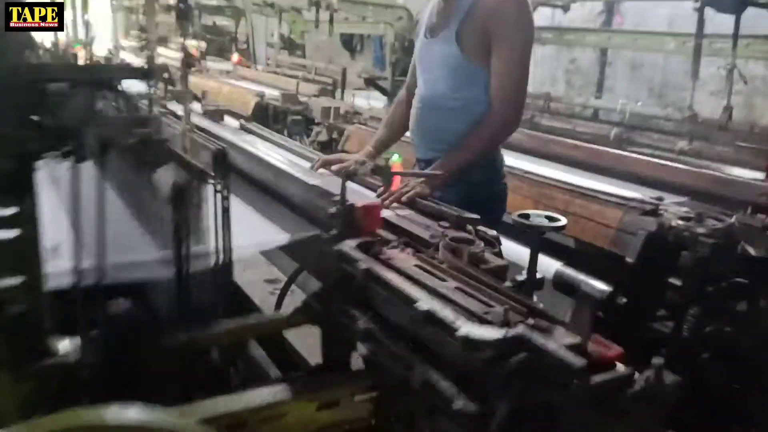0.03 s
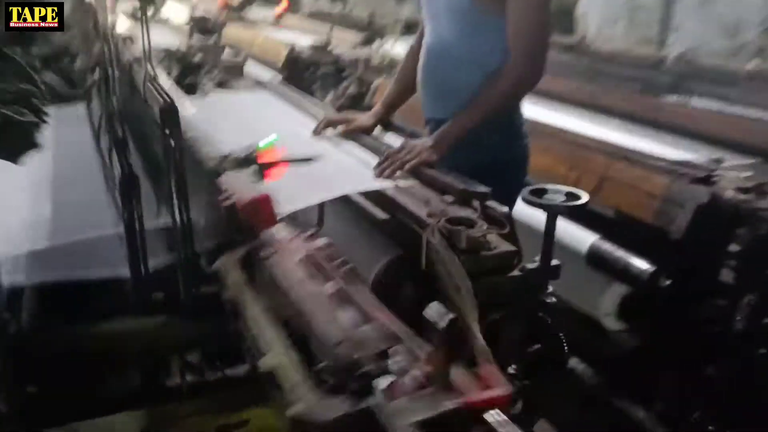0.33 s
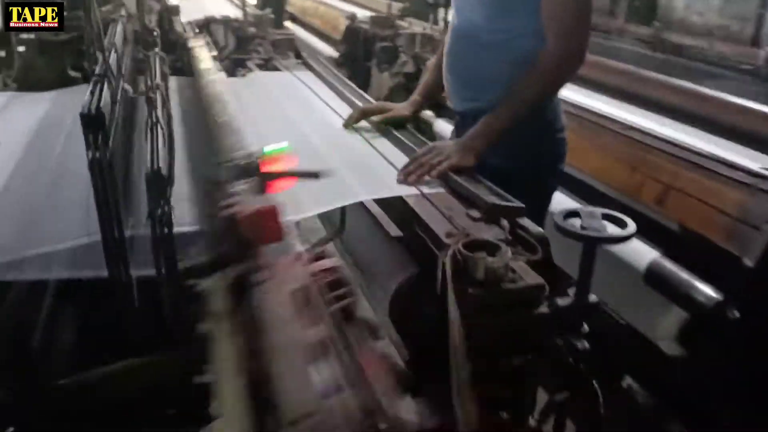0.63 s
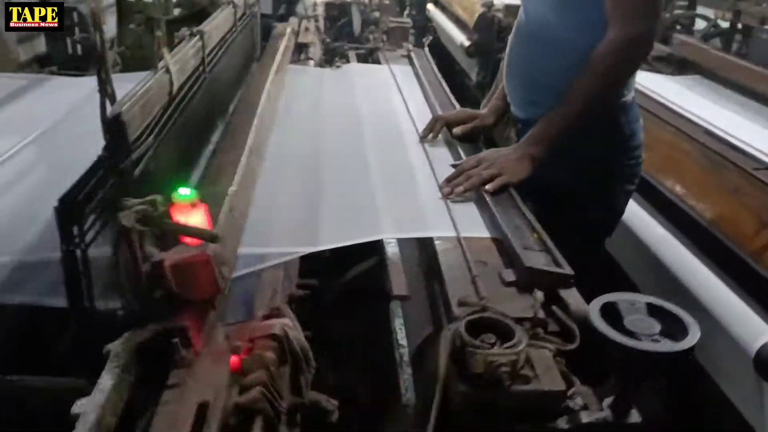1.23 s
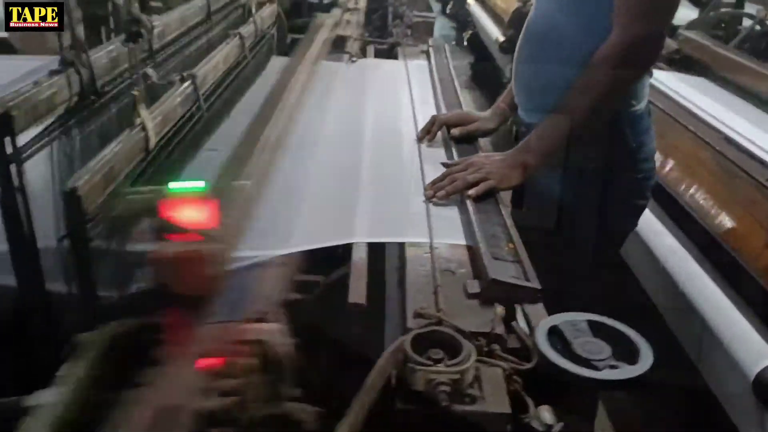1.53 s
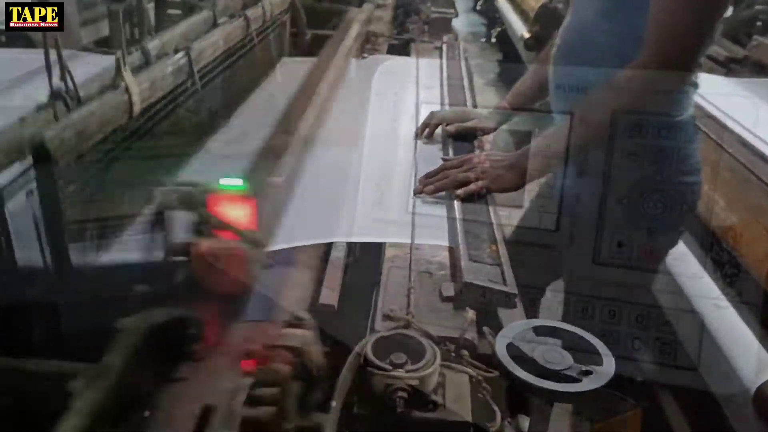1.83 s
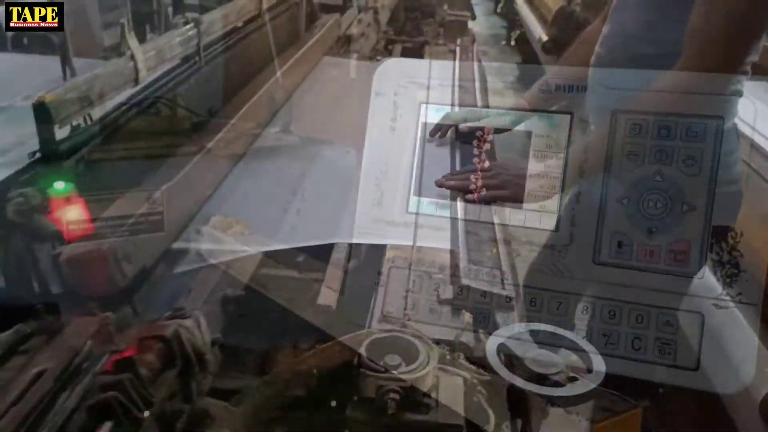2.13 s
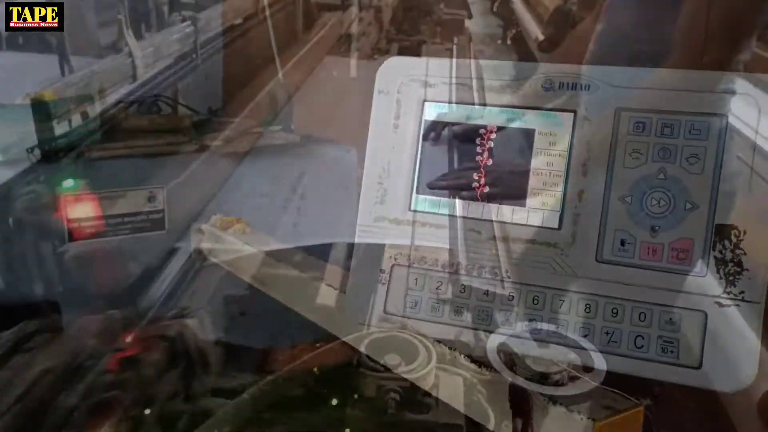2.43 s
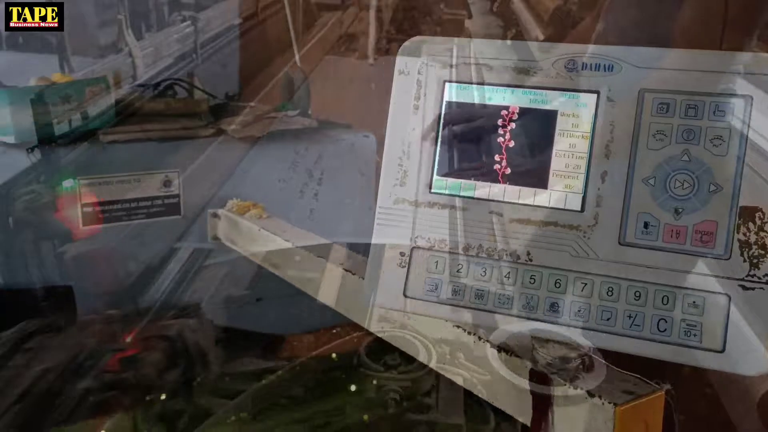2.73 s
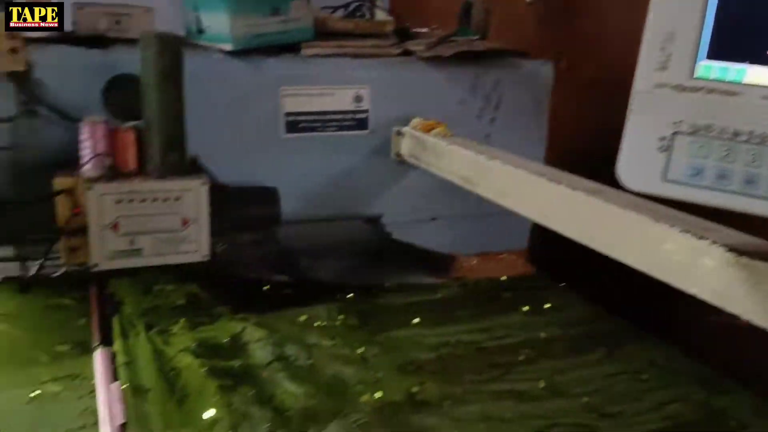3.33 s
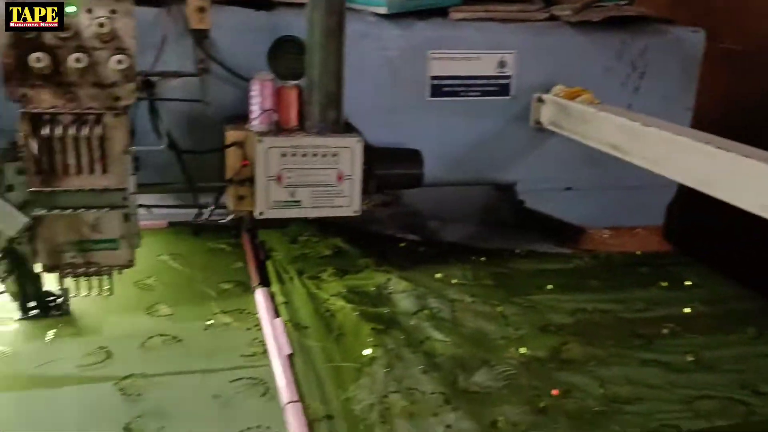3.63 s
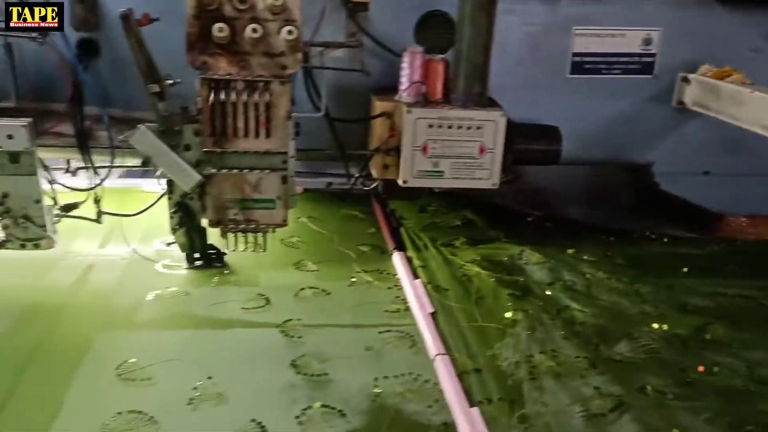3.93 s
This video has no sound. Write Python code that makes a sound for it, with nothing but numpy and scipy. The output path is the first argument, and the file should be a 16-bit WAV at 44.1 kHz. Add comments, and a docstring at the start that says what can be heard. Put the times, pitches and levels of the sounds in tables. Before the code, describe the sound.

Power looms clatter loudly, then an embroidery machine takes over with rapid, even stitching.

```python
"""Shuttle looms, then an embroidery machine.

A hall of shuttle looms clatters: the near loom bangs and rattles over the roar of the others.
The sound breaks off, and a multi-head embroidery machine fades in at nearly nine stitches a second.
Every stitch is the same run of needle-bar thuds, cam clacks and steel ticks; the frame keeps ringing."""
import sys
import numpy as np
from scipy import signal
from scipy.fft import rfft, irfft
from scipy.io import wavfile

SR = 44100
rng = np.random.default_rng(int(sys.argv[2]) if len(sys.argv) > 2 else 0)


def dump_mix(stems):
    """Bounce the given channels to the path in sys.argv[1] as a 16-bit WAV at rate SR."""
    frames = np.atleast_2d(stems).T  # one column per channel
    limited = np.clip(frames, -1, 1)  # hard clip at full scale
    pcm = np.round(limited * 32767).astype(np.int16)
    wavfile.write(sys.argv[1], SR, pcm)


N = 176400
T = np.arange(N) / SR
HZ = np.maximum(np.fft.rfftfreq(N, 1 / SR), 1)


def from_db(db):
    """Decibels to gain."""
    return 10 ** (np.asarray(db) / 20)


def unit_rms(x):
    """Scale to unit rms."""
    return x / np.sqrt(np.mean(x ** 2) + 1e-20)


def across_hz(rows):
    """Table columns interpolated over log frequency."""
    hz, *columns = np.transpose(rows)
    return np.array([np.interp(np.log(HZ), np.log(hz), column) for column in columns])


def clicks(times_s, gains):
    """Train of one-sample clicks."""
    out = np.zeros(N)
    inside = (times_s >= 0) & (times_s < T[-1])
    np.add.at(out, (times_s[inside] * SR).astype(int), gains[inside])
    return out


def lag(x, tau_s):
    """One-pole smoothing."""
    pole = np.exp(-1 / (tau_s * SR))
    return signal.lfilter([1 - pole], [1, -pole], x + 1e-18)


def bursts(start_s, level_db, rise_s, decay_s):
    """Power envelope of knocks: fast swell, exponential decay."""
    hits = clicks(start_s, from_db(level_db) ** 2)
    return lag(lag(hits, decay_s), rise_s) * decay_s * SR


def ring(drive, hz, t60_s):
    """One damped mode, at unit rms."""
    radius = np.exp(-np.log(1000) / (t60_s * SR))
    feedback = [1, -2 * radius * np.cos(2 * np.pi * hz / SR), radius * radius]
    return unit_rms(signal.lfilter([1, 0, -1], feedback, drive + 1e-18))


def crossover(bands):
    """Power-complementary band gains, one per row."""
    above = [1 / (1 + (row[0] / HZ) ** 12) for row in bands] + [0]
    return [np.sqrt(np.maximum(lower - upper, 0)) for lower, upper in zip(above, above[1:])]


def coloured(white, gains, correlation):
    """Two white noises to a stereo pair of given spectrum and left-right correlation."""
    mid, side = rfft(white)
    alike = np.clip(correlation, -1, 1)
    pair = np.sqrt(1 + alike) * mid + np.sqrt(1 - alike) * side * np.array([[1], [-1]])
    return irfft(pair * gains * np.sqrt(SR) / 2, N)


def rattle(rate_per_s=150, decay_s=0.0071, spread_db=2):
    """Small loose contacts at random times: power envelope, mean 1."""
    energies = from_db(spread_db * np.minimum(rng.exponential(1, N), 3)) ** 2
    power = lag(energies * (rng.random(N) < rate_per_s / SR), decay_s)
    return power / power.mean()


# Hall spectrum: freq_hz, left_db_per_hz, right_db_per_hz
HALL_SPECTRUM = [(25.2, -56, -62), (50, -54, -57), (90, -52.5, -59.5), (138, -52.5, -58.5), (338, -55, -59),
                 (490, -55.5, -60), (716, -51.5, -55), (1030, -52, -55.5), (1490, -48.5, -50),
                 (2260, -46, -44), (2880, -49, -49), (3350, -48, -48), (4120, -52, -52), (5440, -56.5, -47),
                 (6110, -55.5, -51.5), (6850, -57.5, -59), (8350, -53, -73.5), (10280, -67.5, -83),
                 (12400, -73, -76.5), (15000, -83, -91)]
# Hall stereo image: freq_hz, correlation
HALL_CORRELATION = [(60, 0.79), (180, 0.96), (550, 0.6), (1400, 0.00047), (5000, 0.02)]
# Mix by band: low_edge_hz, roar_db, blow_db, rattle_db
HALL_BANDS = [(15, -2, -17, -7.5), (251, -1, -14, -10), (1210, -2.5, -8.5, -6.5), (3400, -2.5, -.5, -6),
              (6800, -3.5, 0.5, -5)]


def hall_clatter(blow_power, rattle_power):
    """Steady roar of the looms; blows and rattles ring dense metal resonances, rendered as noise."""
    spectrum, correlation = from_db(across_hz(HALL_SPECTRUM)), across_hz(HALL_CORRELATION)
    out = np.zeros((2, N))
    for (_, roar_db, blow_db, rattle_db), band in zip(HALL_BANDS, crossover(HALL_BANDS)):
        power = from_db(roar_db) ** 2 + from_db(blow_db) ** 2 * blow_power
        power += from_db(rattle_db) ** 2 * rattle_power
        out += np.sqrt(power) * coloured(rng.standard_normal((2, N)), spectrum * band, correlation)
    return out


# Steel parts of the loom: pitch_hz, level_db, t60_s
STEEL_MODES = [(2043, -31, 0.089), (2257, -38, 0.088), (2360, -35, 0.13), (2490, -32.5, 0.14),
               (3227, -35.5, 0.059), (5210, -39, .04)]


def steel_ring(power):
    """Steel parts ring under the blows and rattles."""
    return sum(from_db(db) * ring(np.sqrt(power) * rng.standard_normal((2, N)), hz, t60_s)
               for hz, db, t60_s in STEEL_MODES)


# Drive tones: pitch_hz, level_db
HUM_TONES = [(53.8, -42), (201, -43.5)]


def drive_hum():
    """The drives hum in narrow, wavering tones."""
    return sum(from_db(db) * ring(rng.standard_normal(N), hz, t60_s=1.0) for hz, db in HUM_TONES)


# Loudest blows: start_s, left_db, right_db
PICKER_BLOWS = [(.009, -2, 0.5), (.052, -4, 2), (.101, -12, 0), (.25, -3, -2), (.296, -5, 0),
                (.385, -0.5, 0), (.458, -1, 1), (.507, -5, -1), (.574, -4, 1), (.697, -13, 0),
                (.775, -14, 2), (.908, 1.5, -8), (1.015, -3, 5), (1.073, 0, -2), (1.175, -11, -1),
                (1.2, -4, -2), (1.27, -4, 2), (1.31, -4, 1), (1.446, -1, 0), (1.492, -8, 0.5),
                (1.582, -6, -12), (1.687, -2, -3), (1.79, -3, -2), (1.853, -4, -6), (1.937, -6, 3.5),
                (1.958, -11, -3), (2.097, -3, -2), (2.22, -1, 3), (2.245, -10, -7), (2.291, -5, -10),
                (2.374, 1, -3)]


def blows(gain_db=0.5):
    """Pickers and sleys strike: stereo power envelope."""
    start_s, *sides_db = np.transpose(PICKER_BLOWS)
    return np.array([bursts(start_s, db + gain_db, rise_s=0.0023, decay_s=0.019) for db in sides_db])


# Hits on cast iron: start_s, level_db, pitch_hz
IRON_CLANKS = [(.02, -19, 2280), (.375, -23, 2240), (.53, -14.5, 2030), (.62, -19, 2080), (.69, -17, 2030),
               (.925, -17, 2420), (1.015, -20, 2380), (1.11, -28, 2330), (1.435, -17, 2210),
               (1.51, -16, 1950), (1.575, -19, 2230), (1.635, -15.5, 2350), (1.688, -17, 2480),
               (1.785, -16, 2560), (1.85, -20, 2460), (1.94, -19, 2540), (2.435, -21, 2230)]


def clanks():
    """Each cast-iron part rings briefly at its own pitch when hit."""
    noise = rng.standard_normal((2, N))
    out = np.zeros((2, N))
    for start_s, db, hz in IRON_CLANKS:
        power = bursts(np.array([start_s]), np.array([db]), rise_s=0.0023, decay_s=0.023)
        out += np.sqrt(power) * ring(noise, hz, t60_s=0.013)
    return out


# Heavy beat-ups: start_s, level_db
SLEY_THUMPS = [(.09, -21), (.51, -30), (.57, -24), (.685, -21.5), (1.015, -24), (1.135, -22), (1.37, -21.5),
               (1.944, -23), (2.214, -21)]
# Floor resonances: pitch_hz, level_db, t60_s
FLOOR_MODES = [(48, -4, 0.052), (128, -6.5, 0.06), (196, -12, 0.044)]


def sley_thumps():
    """Heavy beat-ups of the sley shake the floor."""
    shake = sum(from_db(db) * ring(rng.standard_normal(N), hz, t60_s) for hz, db, t60_s in FLOOR_MODES)
    return shake * np.sqrt(bursts(*np.transpose(SLEY_THUMPS), rise_s=0.0041, decay_s=0.011))


# Contacts of small steel parts: start_s, level_db
STEEL_CHINKS = [(.17, -27), (.275, -27), (.32, -29), (.385, -27), (.42, -26), (.525, -28), (.925, -32),
                (1.0, -29), (1.07, -30), (1.21, -26), (1.305, -29), (1.425, -26), (1.45, -26), (1.94, -31),
                (2.1, -27), (2.245, -25), (2.272, -29), (2.38, -24)]
# Their resonances: pitch_hz, level_db, t60_s
JINGLE_MODES = [(8300, -3.5, 0.0055), (10660, -7, .008), (11670, -5, 0.01), (12650, -8, .008)]


def chinks():
    """Small steel parts jingle brightly, mostly left."""
    jingle = sum(from_db(db) * ring(rng.standard_normal((2, N)), hz, t60_s)
                 for hz, db, t60_s in JINGLE_MODES)
    power = bursts(*np.transpose(STEEL_CHINKS), rise_s=0.0025, decay_s=0.018)
    return jingle * np.sqrt(power) * from_db([[0], [-13]])


# Shuttle impacts: start_s, level_db
SHUTTLE_HITS = [(.47, -27), (.71, -26), (1.018, -19), (1.18, -20.5), (1.312, -26), (1.497, -25),
                (1.693, -25), (1.945, -23), (2.226, -22)]
# Steel rung by the shuttle: pitch_hz, level_db, t60_s
BOX_MODES = [(820, -3.5, .04), (1410, 1, .03), (1980, 4, 0.033), (2520, 2, .03), (3500, -1, .025),
             (4700, 3, 0.018), (5260, 9.5, .025), (5900, 7, .025)]


def shuttle_cracks(bounce_s=0.006, bounce_loss_db=2):
    """The shuttle hits its box and bounces twice, ringing the steel; mostly right."""
    start_s, level_db = np.transpose(SHUTTLE_HITS)
    bounce = np.arange(3)
    times_s = start_s[:, None] + bounce_s * bounce * rng.uniform(0.8, 1.2, (len(start_s), len(bounce)))
    hits = clicks(times_s.ravel(), from_db(level_db[:, None] - bounce_loss_db * bounce).ravel())
    t = T[T < 0.1]
    steel = sum(from_db(db) * np.exp(-np.log(1000) * t / t60_s) * np.sin(2 * np.pi * hz * t)
                for hz, db, t60_s in BOX_MODES)
    return signal.fftconvolve(hits, steel)[:N] * from_db([[-8], [0]])


def looms(end_s=2.459, fade_db_per_s=2401):
    """All loom layers, breaking off at end_s."""
    blow_power = blows()
    rattle_power = (rattle() + np.array([rattle(), rattle()])) / 2  # half common, half per side
    out = hall_clatter(blow_power, rattle_power) + steel_ring(blow_power + rattle_power)
    out += clanks() + shuttle_cracks() + chinks()
    out += (drive_hum() + sley_thumps()) * from_db([[2], [-4]])
    return out * from_db(-fade_db_per_s * np.clip(T - end_s, 0, 0.1))


FIRST_STITCH_S, STITCH_PERIOD_S = 2.457, 0.11424
# Embroidery machine spectrum: freq_hz, left_db_per_hz, right_db_per_hz
STITCH_SPECTRUM = [(25, -54, -48.5), (50, -46, -47), (84.5, -52.5, -54.5), (128, -47.5, -47.5),
                   (160, -52, -50.5), (204, -48.5, -48), (300, -49.5, -46.5), (850, -48, -47),
                   (1055, -51.5, -52), (1240, -58, -56), (2220, -61.5, -54), (4150, -69.5, -63),
                   (4840, -71, -60.5), (5880, -77, -53.5), (6520, -89, -68), (7140, -73.5, -79),
                   (8720, -65.5, -108), (10350, -80.5, -100), (12000, -80, -99), (13500, -91, -89),
                   (15000, -88, -87)]
# Its stereo image: freq_hz, correlation
STITCH_CORRELATION = [(60, 1), (180, 0.95), (550, 0.53), (1500, -0.29), (5000, 0.095)]
# Contacts in one stitch: offset_s, thud_db, clack_db, steel_db, tick_db
STITCH_CONTACTS = [(.001, -3, -2, 11, -2), (.007, -6, 5.5, 0, -13), (.016, 2.5, 3.5, 0, -9),
                   (.027, 1, -9, -20, -18), (.043, 2, 0, 4.5, 4), (.065, 0, -7, -16, -16),
                   (.085, -22, -9, 3.5, 7.5), (.091, 0, -0.5, 2.5, -1)]
# Bands (rumble, thud, knock, clack, steel, tick, fizz):
# low_edge_hz, decay_s, contact_db, running_db, repeat_share
CONTACT_BANDS = [(15, 0.04, -5, 1, 0.21), (158, 0.04, -4.5, -4.5, 0.35), (564, 0.014, -4.5, -5, 0.28),
                 (1134, .018, -3, -4, 0.23), (4530, 0.0052, -1.8, -3.5, 0.26),
                 (7000, 0.0063, -1.5, -6.5, 0.07), (10400, .012, -6, -3.5, 0)]


def stitches(stitch_s, register_gains, rise_s=0.0026, spread_db=1.0):
    """Needle bars, cams and steel strike a little unevenly over running noise; part repeats exactly."""
    offset_s, thud, clack, steel, tick = np.transpose(STITCH_CONTACTS)
    times_s = stitch_s[:, None] + offset_s
    spectrum, correlation = from_db(across_hz(STITCH_SPECTRUM)), across_hz(STITCH_CORRELATION)
    rumble, body, knock, upper_mid, treble = register_gains
    band_gains = (rumble, body, knock, upper_mid, treble, treble, treble)
    strengths_db = (thud, thud, thud, clack, steel, tick, tick)
    period = round(STITCH_PERIOD_S * SR)
    out = np.zeros((2, N))
    voices = zip(CONTACT_BANDS, crossover(CONTACT_BANDS), strengths_db, band_gains)
    for (_, decay_s, contact_db, running_db, repeat_share), band, strength_db, gain in voices:
        uneven_db = strength_db + spread_db * rng.standard_normal(times_s.shape)
        strikes = bursts(times_s.ravel(), uneven_db.ravel(), rise_s, decay_s)
        strikes /= strikes[T > FIRST_STITCH_S].mean()
        power = from_db(running_db) ** 2 + from_db(contact_db) ** 2 * strikes
        repeating = rng.standard_normal((2, period))[:, np.arange(N) % period]
        fresh = rng.standard_normal((2, N))
        white = np.sqrt(repeat_share) * repeating + np.sqrt(1 - repeat_share) * fresh
        out += gain * np.sqrt(power) * coloured(white, spectrum * band, correlation)
    return out


# Frame resonances: pitch_hz, early_db, late_db
FRAME_RESONANCES = [(123, -43, -32.5), (182.8, -36, -46), (194.2, -37, -38), (202.5, -46, -33),
                    (289, -34.5, -41), (322, -33.5, -38), (375, -32.5, -37.5), (463.3, -34.5, -37.5),
                    (659, -35.5, -35.5), (743, -40.5, -39), (755, -43, -33), (923, -37, -39.5)]


def frame_ring(stitch_s, register_gains, t60_s=0.47, shudder_share=0.38, shift_s=3.2):
    """One push a stitch and an irregular shudder ring the frame; the mode balance shifts at shift_s."""
    pushes = clicks(stitch_s, np.ones(len(stitch_s)))
    duty = np.mean(T > FIRST_STITCH_S)
    late = lag(1.0 * (T > shift_s), tau_s=0.02)
    out = np.zeros(N)
    for hz, early_db, late_db in FRAME_RESONANCES:
        register = sum(hz > row[0] for row in CONTACT_BANDS[1:])
        gain = register_gains[register] * from_db(early_db + (late_db - early_db) * late)
        pushed = np.sqrt((1 - shudder_share) * duty) * ring(pushes, hz, t60_s)
        shudder = np.sqrt(shudder_share) * ring(rng.standard_normal(N), hz, t60_s)
        out += gain * (pushed + shudder)
    return out


# Machine level by register: time_s, rumble_db, body_db, knock_db, upper_mid_db, treble_db
REGISTER_LEVELS = [(2.53, -20.5, -18, -22, -17, -15.5), (2.59, -12, -10.5, -5.5, -5.5, -7.5),
                   (2.67, -9, -1.5, -8, 0, -1.5), (2.71, -6.5, -0.5, -1, 1.5, -0.5),
                   (2.82, -4.2, 3, 2, 5.5, 4), (3.05, -3, 1.5, 2, 5.5, 4), (3.175, -3, 0.5, 3.5, 5, 3.5),
                   (3.205, -8.5, -6.5, -4, -1, -3), (3.4, -1.5, -2, -2, -1, -1.3),
                   (3.65, -0.5, 0.7, 0, 1.3, 0), (4, 3, 1, 3.5, 2, 0)]


def embroidery(start_s=2.526, onset_s=0.0081):
    """Stitches and frame fade in; the level dips briefly and recovers."""
    time_s, *levels_db = np.transpose(REGISTER_LEVELS)
    register_gains = [from_db(np.interp(T, time_s, db)) for db in levels_db]
    stitch_s = np.arange(FIRST_STITCH_S, T[-1], STITCH_PERIOD_S)
    out = stitches(stitch_s, register_gains) + frame_ring(stitch_s, register_gains)
    return out * np.clip((T - start_s) / onset_s, 0, 1)


def scene(hiss_db=-73):
    """Looms, then the embroidery machine, over a faint dull hiss."""
    machines = looms() + embroidery()
    hiss = unit_rms(lag(rng.standard_normal((2, N)), tau_s=0.0001))
    return machines + from_db(hiss_db) * hiss


def record(dry, cutoff_hz=15500):
    """Peak clip, then a steep low-pass."""
    clipped = np.clip(dry, -0.95, 0.95)
    return irfft(rfft(clipped) / np.sqrt(1 + (HZ / cutoff_hz) ** 200), N)


dry = scene()
out = record(dry)
dump_mix(out)
```